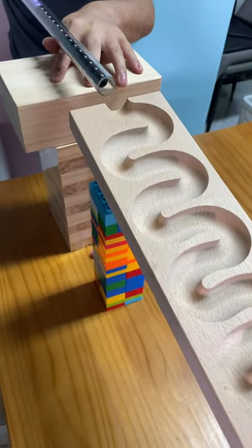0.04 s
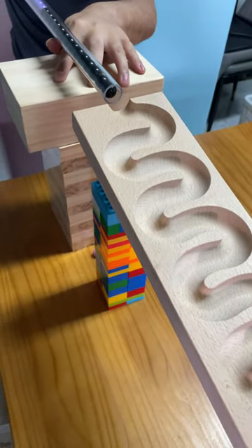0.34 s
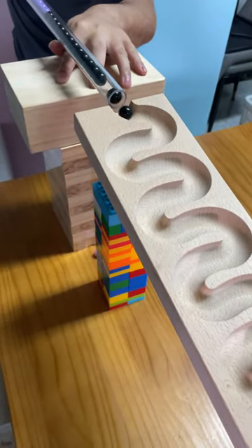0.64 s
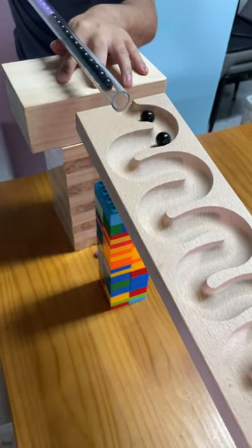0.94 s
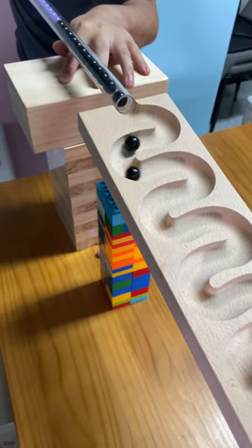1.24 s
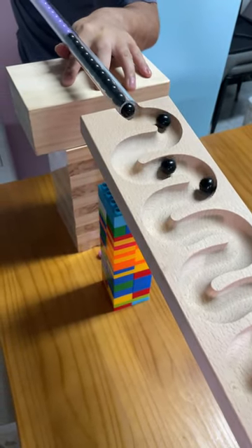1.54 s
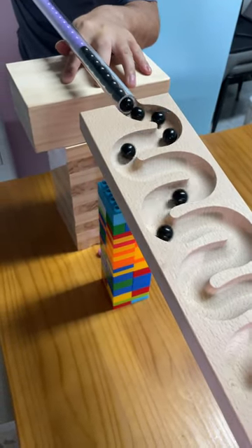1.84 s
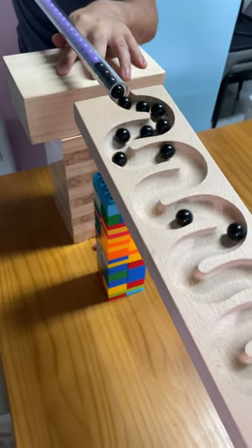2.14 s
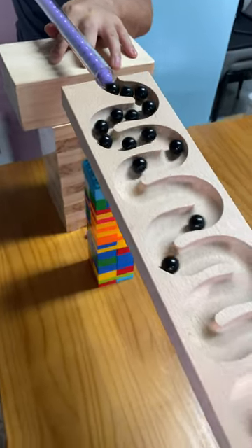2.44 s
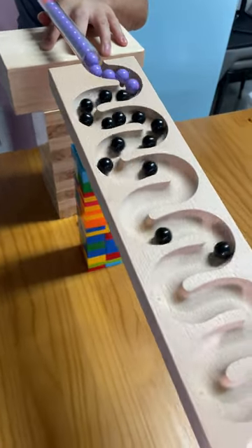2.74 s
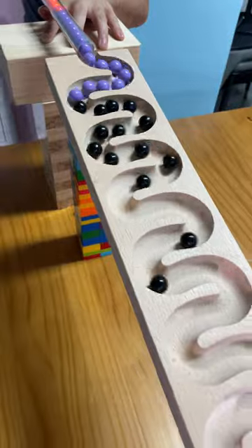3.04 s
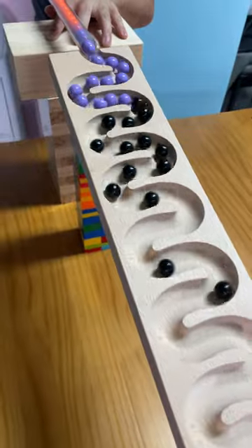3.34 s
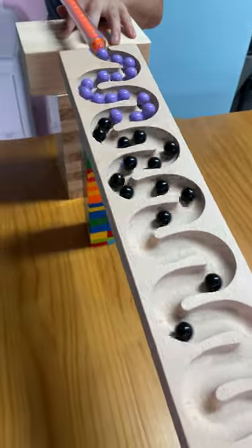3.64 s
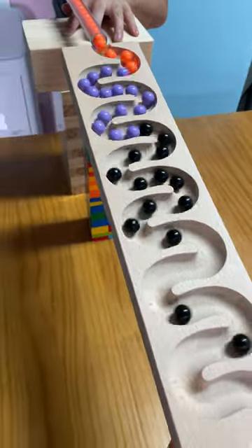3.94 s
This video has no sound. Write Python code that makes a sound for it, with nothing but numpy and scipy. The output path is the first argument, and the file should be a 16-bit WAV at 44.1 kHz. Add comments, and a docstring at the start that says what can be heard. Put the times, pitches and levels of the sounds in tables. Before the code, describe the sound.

A few marbles drop onto a wooden track and knock around its bends. More follow, clicking against each other until the nearby rolling becomes a continuous rattle, with a faint table rumble in a small room.

```python
"""Woody knocks and glassy ticks build into a rattle: marbles running down a hardwood track.
They leave a tube one by one and knock against the bends of a winding groove, which rings the board.
They scuff the walls and tick against each other; their rolling grows as the track fills.
The table under the board rumbles, and a small room adds a short tail and a faint hush."""
import sys
import numpy as np
from scipy import signal
from scipy.io import wavfile
from scipy.ndimage import uniform_filter1d

SR = 44100
rng = np.random.default_rng(int(sys.argv[2]) if len(sys.argv) > 2 else 0)


def store_pcm(level_fs):
    """Save levels as 16-bit WAV."""
    pcm = np.round(np.clip(level_fs, -1, 1) * 32767).astype(np.int16)
    wavfile.write(sys.argv[1], SR, np.atleast_2d(pcm).T)


N = 176400

# board modes: (frequency [Hz], relative level [dB], t60 [s], change once the marbles have spread [dB])
BOARD_MODES = [(326.3, -22.5, 0.071, 0.5), (610.7, -27.5, 0.11, 0.5), (854, -15, 0.073, -5),
               (947, -32.5, 0.043, 9), (1107, -34, 0.041, 11), (1466.6, -4.5, 0.038, 1),
               (2095, -10, 0.084, -0.5), (2190, -8.5, 0.033, 8.5), (2391, 2, 0.031, -1.5),
               (2941.5, 0, 0.039, 0.5), (3506, -14, 0.037, -0.5), (3704, -12.5, 0.034, 5),
               (4300, -5.5, 0.018, -3), (4720, -19, 0.019, 11.5), (5287, -5.5, 0.023, -2),
               (5930, -14.5, 0.012, 11), (5980, -25.5, 0.027, -9)]
# rolling effort, growing as the track fills: (time [s], level [dB])
ROLL_EFFORT = [(0, -110), (.62, -100), (.7, -53.5), (1.04, -53.5), (1.18, -58.5), (1.28, -54),
               (1.38, -54.5), (1.6, -50.5), (1.85, -44.5), (2.2, -44), (2.6, -37.5), (2.8, -40),
               (2.98, -40), (3.25, -36.5), (3.41, -37.5), (3.56, -37), (4, -36.5)]
CONTACT_DELAY_S = 0.0006


def from_db(db):
    """Decibels to gain."""
    return 10 ** (np.asarray(db) / 20)


def gain_curve(rows):
    """Per-sample gain from (time [s], level [dB]) rows."""
    return from_db(np.interp(np.arange(N) / SR, *np.transpose(rows)))


def at_hz(rows, hz):
    """Read a table on a log-frequency axis."""
    row_hz, values = np.transpose(rows)
    return np.interp(np.log(hz), np.log(row_hz), values)


def clicks(times_s, gains):
    """Impulses at the given times."""
    return np.bincount(np.clip(times_s * SR, 0, N - 1).astype(int), gains, N)


def random_clicks(per_s, spread_db):
    """Impulses at random times, mostly small, a few large."""
    sizes = from_db(spread_db * np.minimum(rng.exponential(1, N), 4))
    return sizes * rng.choice([-1, 1], N) * (rng.random(N) < per_s / SR)


def ring(x, hz, t60_s):
    """One mode: a click starts a damped sine that swells over its first cycle."""
    r, w = from_db(-60 / (t60_s * SR)), 2 * np.pi * hz / SR
    x = signal.sosfilt(signal.butter(1, [hz * .75, hz * 1.33], "band", fs=SR, output="sos"), x + 1e-18)
    return signal.lfilter([0, np.sin(w)], [1, -2 * r * np.cos(w), r * r], x + 1e-18)


def decay(x, t60_s):
    """Envelope that jumps at each click and dies away."""
    return np.sqrt(signal.lfilter([1], [1, -from_db(-120 / (t60_s * SR))], x ** 2 + 1e-24))


def noise_bands(spectrum, envelope=lambda hz: 1):
    """Third-octave (centre [Hz], noise) pairs under envelope(hz); unit total power when steady."""
    edges_hz = 20 * 2 ** (np.arange(30) / 3)
    centres_hz = np.sqrt(edges_hz[1:] * edges_hz[:-1])
    white = rng.standard_normal((2, N))
    gains = from_db(at_hz(spectrum, centres_hz))
    gains /= np.sqrt(np.sum(gains ** 2 * np.diff(edges_hz)) * 2 / SR)
    for k, hz in enumerate(centres_hz):
        bandpass = signal.butter(3, edges_hz[k:k + 2], "band", fs=SR, output="sos")
        yield hz, gains[k] * signal.sosfilt(bandpass, white[k % 2] * envelope(hz))


def noise(spectrum, envelope=lambda hz: 1):
    """Coloured noise under envelope(hz)."""
    return sum(band for _, band in noise_bands(spectrum, envelope))


def treble_weight(hz):
    """How much contact hardness counts at this frequency."""
    # effect of a hard contact: (frequency [Hz], weight [1])
    hardness = [(1500, 0), (2500, 0.17), (3200, 0.55), (4700, 0.74), (7000, 1.35), (12000, 1.08)]
    return at_hz(hardness, hz)


def track_spread(times_s):
    """How far the marbles have spread down the track, 0-1."""
    return np.interp(times_s, [2.05, 2.74], [0, 1])


def jostles(per_s, above_roll_db, spread_db, start_s=1.8):
    """Light collisions on the crowded track: (time [s], level [dB]) rows."""
    gap, size = rng.random((200, 2)).T
    times_s = start_s + np.cumsum(2 * gap) / per_s
    roll_db = np.interp(times_s, *np.transpose(ROLL_EFFORT))
    level_db = roll_db + above_roll_db + spread_db * (2 * size - 1)
    return np.column_stack([times_s, level_db])[times_s < N / SR]


def background():
    """Steady room hush; a faint bright hiss dies away at the start."""
    # still room: (frequency [Hz], relative density [dB])
    hush = [(22, -22), (38, 3), (50, -13), (70, -6), (130, 0.5), (200, -14), (350, -19.5), (600, -26.5),
            (1200, -27), (2200, -46), (6000, -50.5), (15000, -74)]
    # opening hiss: (frequency [Hz], relative density [dB])
    hiss = [(1000, -15), (2500, -2), (5800, 0), (7500, -16), (10500, -11), (13000, -35)]
    hush_db, hiss_db, hiss_t60_s = -58.5, -67.5, 0.33
    fade = from_db(hiss_db - 60 * np.arange(N) / SR / hiss_t60_s)
    return from_db(hush_db) * noise(hush) + fade * noise(hiss)


def room(x, gain_db=-12.5, build_s=0.017):
    """Diffuse tail that dies sooner in the treble."""
    # tail colour: (frequency [Hz], relative density [dB])
    colour = [(100, 1.6), (350, 1.5), (1000, -2.9), (2400, -1.4), (5000, -1.5), (10000, 0.54)]
    # tail decay: (frequency [Hz], t60 [s])
    t60s = [(100, 1), (1000, 0.52), (2500, 0.39), (5000, 0.33), (11000, 0.18)]
    t = np.arange(N) / SR
    tail = sum(band * from_db(-60 * t / at_hz(t60s, hz)) for hz, band in noise_bands(colour))
    tail *= np.minimum(t / build_s, 1) ** 2
    return from_db(gain_db) * signal.fftconvolve(x, tail / np.linalg.norm(tail))[:N]


def table_rumble():
    """Rolling shakes the table top at its lowest resonance."""
    # rumble strength: (time [s], level [dB])
    levels = [(0, -98), (.62, -94), (.8, -53.5), (1.2, -64), (1.8, -56), (2.3, -53.5), (3.4, -52.5),
              (4, -54.5)]
    shake = ring(rng.standard_normal(N), hz=97.4, t60_s=0.14)
    local_rms = np.sqrt(uniform_filter1d(shake ** 2, size=8000) + 1e-12)
    return gain_curve(levels) * shake / local_rms


def unit_rms(x):
    """Scale to unit power."""
    return x / np.sqrt(np.mean(x ** 2) + 1e-20)


def board_radiation(x):
    """The board radiates weakly between its modes."""
    # radiation dips: (centre [Hz], width [Hz], gain [dB])
    gaps = [(1556, 67, -3.5), (2583, 140, -6.5), (3236, 326, -10.5), (4020, 270, -2), (5130, 190, -1.5),
            (5750, 300, -5)]
    for hz, width_hz, db in gaps:
        x = x + (from_db(db) - 1) * signal.lfilter(*signal.iirpeak(hz, hz / width_hz, fs=SR), x)
    return x


def scuffs(width_s=0.0066, top_hz=5200):
    """A lone marble rubs the wall of a bend: a short swell of friction excites the board."""
    # wall contacts: (peak time [s], level [dB], treble tilt [dB])
    rubs = [(1.052, -49, -19), (1.129, -50.5, -14.5), (1.240, -47.5, -13), (1.324, -48, -27),
            (1.399, -47, -10)]
    times_s, db, treble_db = np.transpose(rubs)
    swells = np.exp(-np.abs(np.arange(N) / SR - times_s[:, None]) / width_s)
    friction = signal.sosfilt(signal.butter(4, top_hz, fs=SR, output="sos"), rng.standard_normal(N))
    rings = 0
    for hz, mode_db, t60_s, _ in BOARD_MODES:
        envelope = from_db(db + mode_db + treble_db * treble_weight(hz)) @ swells
        rings += envelope * unit_rms(ring(friction, hz, t60_s))
    return rings


def rolling(ring_db=-3.5, grain_db=-6):
    """Tiny soft bumps ring the board, low modes most, over the rough rush of the wood grain."""
    # wood grain under the marbles: (frequency [Hz], relative density [dB])
    grain_spectrum = [(60, -30), (160, 4), (220, -5), (330, 6), (480, -1.5), (950, 7), (1500, 3), (2250, 7),
                      (3300, -42), (5500, -14), (7500, -51), (11000, -47), (15000, -62)]
    tilt_db, bass_db, brightening = -30.5, 8, 0.42
    bumps = random_clicks(per_s=600, spread_db=4)
    spread = track_spread(np.arange(N) / SR)
    rings = 0
    for hz, mode_db, t60_s, change_db in BOARD_MODES:
        softness_db = tilt_db * treble_weight(hz) + np.interp(hz, [320, 850], [bass_db, 0])
        gain = from_db(mode_db + softness_db + change_db * spread)
        rings += gain * ring(bumps * rng.standard_normal(N), hz, t60_s)
    roughness = unit_rms(decay(bumps, t60_s=0.065))
    effort = gain_curve(ROLL_EFFORT)
    # harder rolling is brighter
    rush = lambda hz: roughness * (effort / effort.max()) ** (brightening * treble_weight(hz))
    grain = noise(grain_spectrum, rush)
    return effort * (from_db(ring_db) * unit_rms(rings) + from_db(grain_db) * grain)


def ticks(gain_db=-4.5):
    """Marble on marble: very short and bright, with many faint ones once the track is crowded."""
    # marble contacts: (time [s], level [dB])
    touches = [(2.0892, -49), (2.3354, -30), (2.425, -41), (2.439, -17.5), (2.6858, -36), (2.6937, -33),
               (2.7176, -37), (2.7437, -30.5), (2.802, -31), (2.8383, -38), (2.9596, -38), (3.0234, -49),
               (3.1221, -38.5), (3.1946, -45), (3.2126, -35), (3.2752, -36), (3.2979, -36), (3.433, -22),
               (3.476, -36), (3.5059, -22), (3.6197, -51), (3.6446, -29), (3.7618, -40), (3.7912, -36),
               (3.812, -43), (3.8664, -37), (3.9522, -35)]
    # tick colour: (frequency [Hz], relative density [dB])
    spectrum = [(1000, -39), (2500, -5), (5500, 10), (7500, 4), (9500, 6), (11500, -2), (15000, -28)]
    faint = jostles(per_s=60, above_roll_db=-14.5, spread_db=15.5)
    times_s, db = np.vstack([touches, faint]).T
    envelope = decay(clicks(times_s + CONTACT_DELAY_S, from_db(db)), t60_s=0.0035)
    return from_db(gain_db) * noise(spectrum, lambda hz: envelope)


def knocks(ring_db=-11, crack_db=-13):
    """Marble on board: a crack and ringing modes, mixed by where and how hard it lands."""
    # strikes: (time [s], level [dB], treble relative to level [dB])
    strikes = [(0.6424, -11, -16.5), (0.6757, -15, -23), (0.6933, -16.5, -27), (0.7194, -24.5, -36),
               (0.847, -9.5, -12.5), (0.8701, -15, -32), (0.8884, -27, -24), (0.908, -27, -32),
               (0.9243, -24, -43), (0.9354, -28, -42), (0.9572, -29, -28), (1.0045, -31, -50),
               (1.3808, -30, -32), (1.3981, -24, -31), (1.4346, -12, -20.5), (1.4706, -14, -25),
               (1.5, -19, -20.5), (1.5199, -24, -16.5), (1.5387, -21, -27), (1.6407, -13.5, -23.5),
               (1.6779, -13.5, -23), (1.7039, -19.5, -25), (1.722, -22.5, -26), (1.7646, -13.5, -16.5),
               (1.7999, -13, -19.5), (1.826, -17.5, -18.5), (1.8585, -9.5, -15.5), (1.903, -15, -26),
               (1.9354, -8.5, -13.5), (1.9716, -16, -25), (2.0019, -15.5, -37), (2.0224, -9, -16.5),
               (2.0608, -20.5, -19), (2.0888, -20, -17), (2.1061, -8.5, -14), (2.1424, -17.5, -29),
               (2.168, -8, -12.5), (2.192, -20, -23), (2.2023, -23, -8), (2.2393, -9.5, -11),
               (2.2654, -18, -28), (2.316, -10, -11), (2.357, -16.5, -22), (2.3824, -8.5, -13.5),
               (2.4202, -15.5, -16.5), (2.44, -9.5, -10.5), (2.4698, -16.5, -20), (2.5139, -11.5, -13.5),
               (2.5386, -20, -21), (2.592, -10.5, -12), (2.63, -16.5, -16), (2.6524, -9.5, -13.5),
               (2.6878, -21.5, -11), (2.7342, -13, -11.5), (2.7576, -19, -20), (2.7778, -23.5, -17),
               (2.827, -10, -13), (2.8566, -24.5, -8.5), (2.8881, -9, -11.5), (2.9264, -16.5, -9.5),
               (3.0095, -11, -12), (3.055, -13.5, -18), (3.0803, -7.5, -13), (3.1555, -8.5, -12),
               (3.1854, -21, -10), (3.2527, -7.5, -14), (3.3169, -8, -13.5), (3.3566, -15.5, -16),
               (3.3724, -13, -35), (3.4308, -8.5, -17), (3.466, -27, -9), (3.482, -17, -22),
               (3.5049, -6, -13.5), (3.5174, -33, 0), (3.5588, -17, -4.5), (3.5575, -5.5, -11),
               (3.5907, -15, -39), (3.676, -10.5, -10), (3.7253, -12, -13.5), (3.7443, -6.5, -14),
               (3.769, -34, -4), (3.8204, -10, -13.5), (3.8465, -21.5, -14), (3.926, -7.5, -15),
               (3.9499, -35, -1)]
    # crack of the board's many damped modes: (frequency [Hz], relative density [dB])
    crack_spectrum = [(100, -31), (250, -3), (600, -10), (1100, -17.5), (2200, 9.5), (4800, 2),
                      (6300, -8.5), (7500, -45), (9000, -17.5), (11500, -22), (15000, -61)]
    usual_treble_db, scatter_db, max_lag_s, crack_t60_s = -15.5, 1.28, 0.0015, 0.026
    light = [(s, db, usual_treble_db) for s, db in jostles(per_s=28, above_roll_db=10, spread_db=6.5)]
    times_s, db, treble_db = np.transpose(list(strikes) + light)
    strength_db = lambda hz: db + (treble_db - usual_treble_db) * treble_weight(hz)
    offsets_db = scatter_db * rng.standard_normal((300, len(BOARD_MODES)))[:len(times_s)]
    lags_s = CONTACT_DELAY_S + max_lag_s * rng.random((300, len(BOARD_MODES)))[:len(times_s)]
    rings = 0
    for k, (hz, mode_db, t60_s, change_db) in enumerate(BOARD_MODES):
        gains = from_db(strength_db(hz) + mode_db + change_db * track_spread(times_s) + offsets_db[:, k])
        rings += ring(clicks(times_s + lags_s[:, k], gains), hz, t60_s)

    def burst(hz):
        hits = clicks(times_s + CONTACT_DELAY_S, from_db(strength_db(hz)))
        return decay(hits, crack_t60_s * np.interp(hz, [5000, 10000], [1, .7]))

    return from_db(ring_db) * rings + from_db(crack_db) * noise(crack_spectrum, burst)


def scene():
    """The track and its table in the room, mono."""
    track = board_radiation(knocks() + scuffs() + rolling()) + ticks()
    return (track + room(track) + table_rumble() + background())[None]


def record(dry):
    """Microphone passband, then a steep low-pass."""
    mic_band_hz, cutoff_hz = [32.6, 11800], 13900
    mic = signal.sosfilt(signal.butter(4, mic_band_hz, "band", fs=SR, output="sos"), dry)
    return signal.sosfilt(signal.ellip(8, .3, 70, cutoff_hz, fs=SR, output="sos"), mic)


dry = scene()
out = record(dry)
store_pcm(out)
```